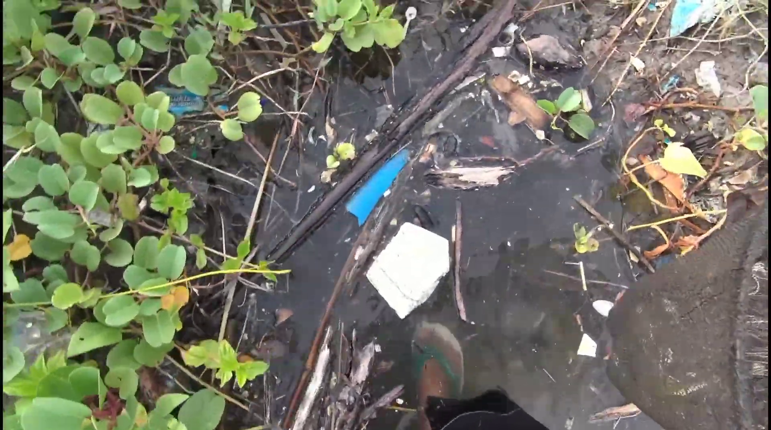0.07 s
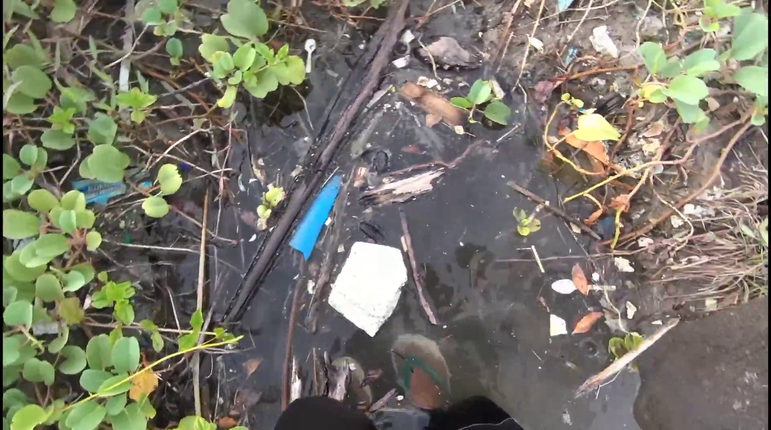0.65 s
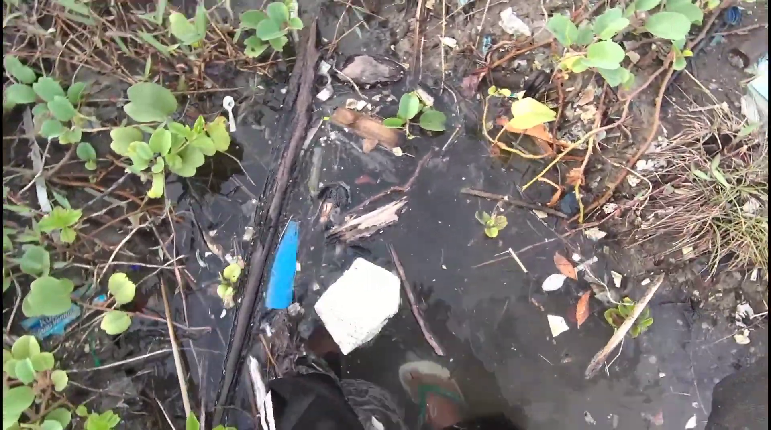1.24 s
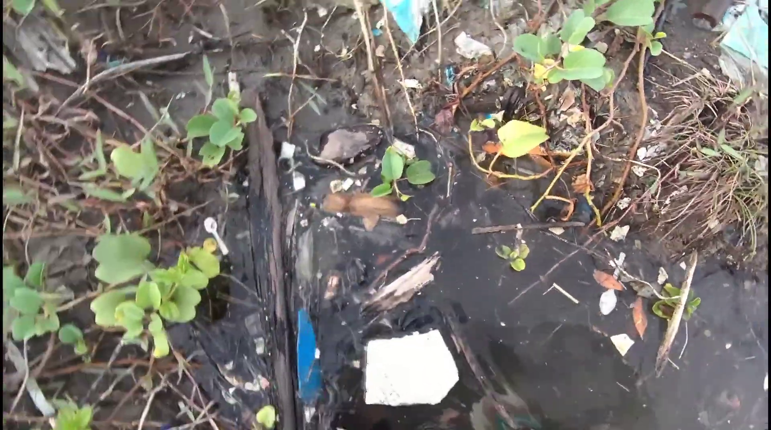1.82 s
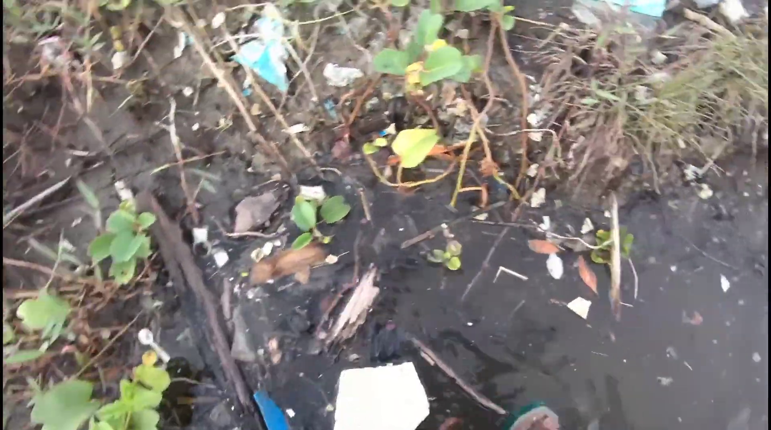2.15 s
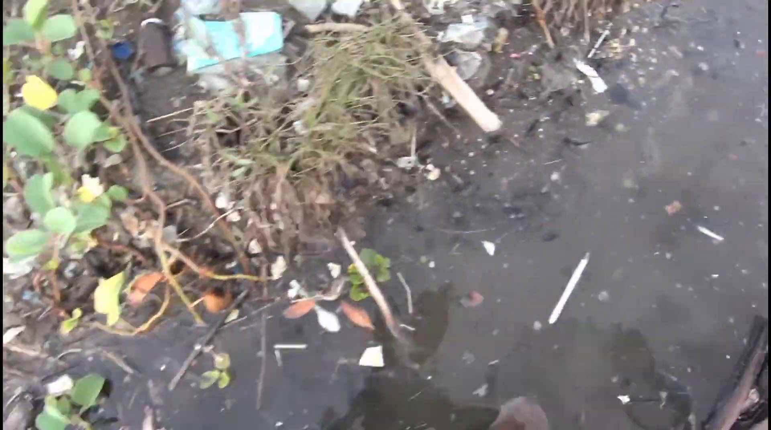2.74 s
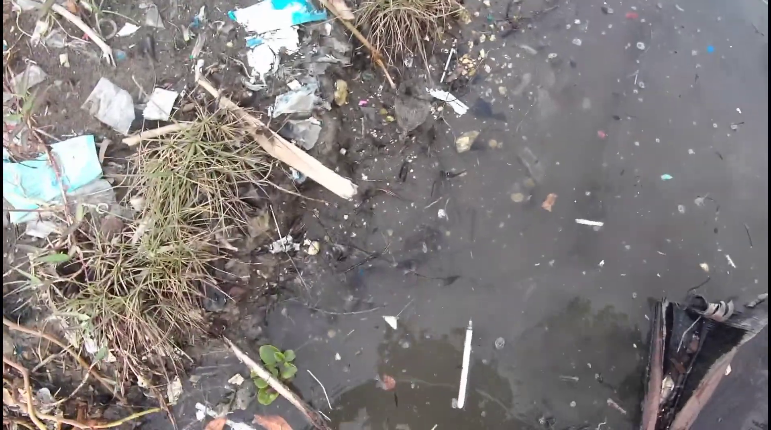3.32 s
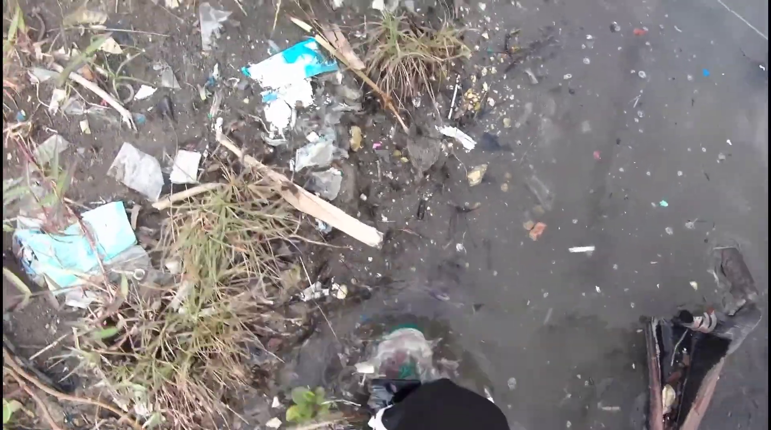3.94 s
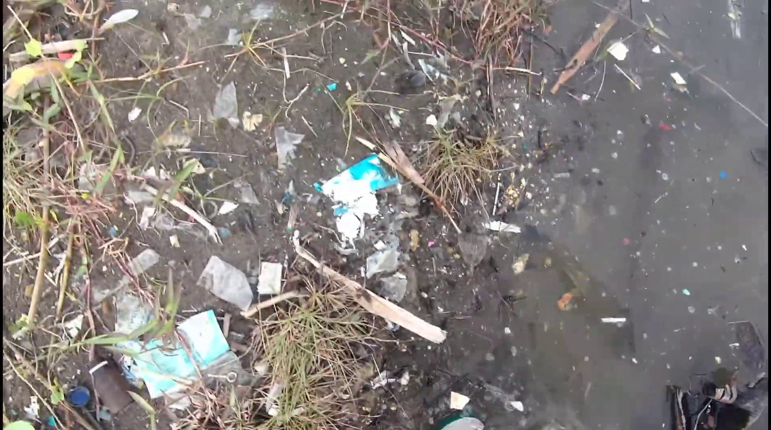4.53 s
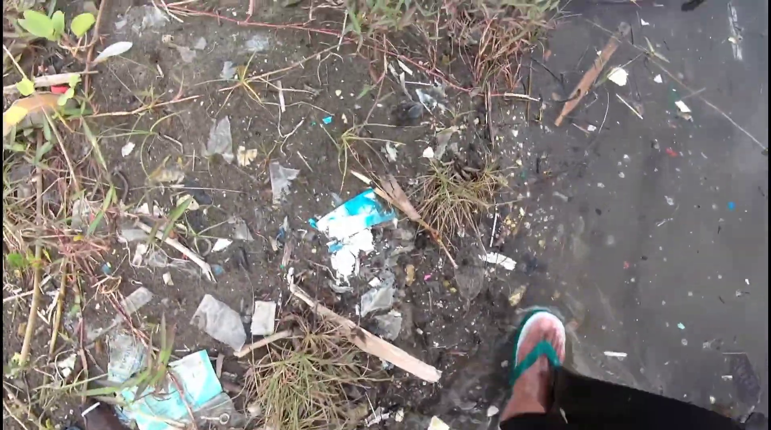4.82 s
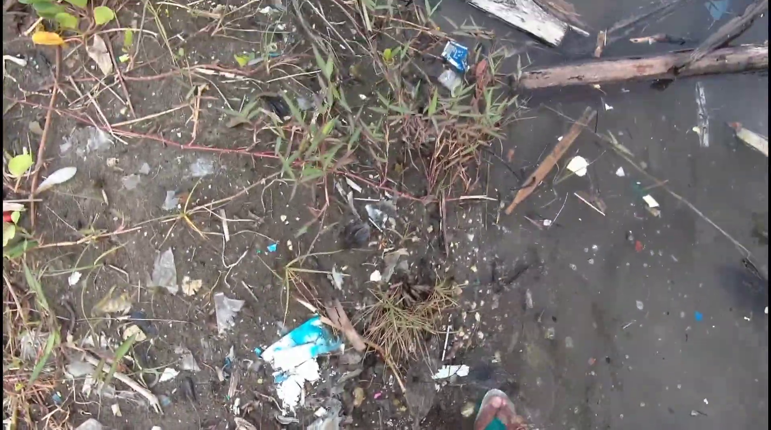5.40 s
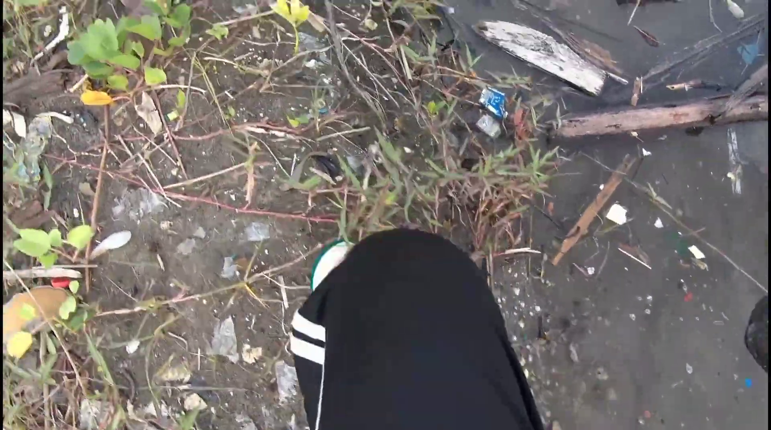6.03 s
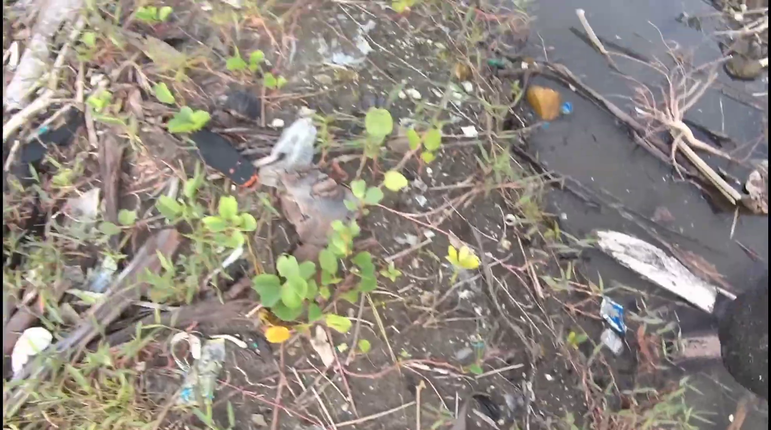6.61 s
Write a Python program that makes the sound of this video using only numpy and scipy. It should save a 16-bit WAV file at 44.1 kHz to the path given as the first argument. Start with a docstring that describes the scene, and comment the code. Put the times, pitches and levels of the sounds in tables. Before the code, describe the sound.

Close, unhurried footsteps slosh and gurgle through shallow water at a muddy shore. They start as small plops, grow busiest in the middle with squelching and light splashing, then give way to drips, a brief rustle of trousers and a few more steps onto the wet bank. A low outdoor rumble continues underneath, and gusts thump on the microphone, hardest at the end.

```python
"""Sandalled feet wade slowly through shallow muddy water and step up onto a wet bank.
Each step traps air that rings as bubbles; mud smacks and crackles, drops patter off a lifted sandal.
A trouser leg swishes past, cloth rubbing on cloth. Wind buffets the two microphone ports
over a low outdoor rumble, a steady drone and a few faint tones.
A faint fuzzy whine near 1 and 2 kHz comes and goes, probably microphone self-noise."""
import sys
import numpy as np
from scipy import signal
from scipy.fft import rfft, irfft
from scipy.io import wavfile
from scipy.ndimage import uniform_filter1d

SR = 44100
rng = np.random.default_rng(int(sys.argv[2]) if len(sys.argv) > 2 else 0)


def put_to_file(sound):
    """Save the sound as 16-bit audio at rate SR, in the file named by the first command-line argument."""
    columns = np.atleast_2d(sound).T  # one column per channel
    safe = np.clip(columns, -1, 1)
    whole_steps = np.round(safe * 32767)
    wavfile.write(sys.argv[1], SR, whole_steps.astype(np.int16))


N = 293706
TIME = np.arange(N) / SR
FREQ = np.fft.rfftfreq(N, 1 / SR)

# spray off water and mud: f/Hz, level/dB
SPRAY_SPECTRUM = [(700, -32), (1700, 10), (3200, 9.5), (5600, -0.5), (8000, -14), (14000, -28)]


def wading(churn_db=-4, wash_db=-9.5, crackle_db=-3.5, spray_db=-15.5,
           surge_db=2.3, surge_hz=25, spit_db=3, spit_hz=200):
    """Steps churn up bubbles and a soft wash in uneven surges; the mud crackles and spits."""
    # bubbles in churned water: f/Hz, level/dB
    water_bubbles = [(280, -19.5), (450, -4), (800, 3), (1100, 5), (1500, -11), (2300, -27)]
    # bubbles in mud: f/Hz, level/dB
    mud_bubbles = [(1400, -0.5), (1900, 8), (2500, 2), (3400, 0), (4300, -31), (5800, -1)]
    # pushed water: f/Hz, level/dB
    wash_spectrum = [(80, -5), (300, 7), (500, -1.5), (950, 17), (1600, -10.5), (2600, -13), (5000, -30),
                     (12000, -55)]
    churn = gain(churn_db) * swarm(water_bubbles, cycles=49, spread_db=14, rise_oct_s=28, count=4200)
    wash = gain(wash_db) * noise(gain(curve(wash_spectrum)), 1)
    crackle = gain(crackle_db) * swarm(mud_bubbles, cycles=13, spread_db=10, rise_oct_s=56, count=8000)
    spray = noise(gain(curve(SPRAY_SPECTRUM)), 1)
    spray = gain(spray_db) * evened(spray * gain(spit_db * drift(spit_hz)))
    surges = gain(surge_db * drift(surge_hz))
    water, mud = stirring(column=2), stirring(column=3)
    return surges * (water * (churn + wash) + mud * (crackle + spray))


def stirring(column, push_s=0.026, settle_s=0.028, ripple_db=-12, ripple_s=0.3):
    """Envelope of stirred water or mud: each push settles fast, its ripples lap on."""
    # pushes and pulls of a foot: t/s, hold/s, water level/dB, mud level/dB
    steps = [(.62, 0.79, -82, -80.5), (2.415, 0.23, -57, -76), (3.29, 0.06, -64, -69),
             (3.5, 0.22, -52, -62.5), (3.69, 0.098, -49, -61.5), (3.81, 0.18, -48, -59.5),
             (3.962, 0.03, -54.5, -55.5), (4.02, 0.037, -51.5, -60.5), (4.08, 0.08, -55.5, -66.5),
             (4.79, 0.17, -63, -75.5), (5.0, 0.11, -62, -83), (5.48, 0.022, -61.5, -66.5),
             (5.565, 0.18, -53.5, -69), (6.03, 0.062, -61, -66), (6.175, 0.019, -60.5, -73),
             (6.33, 0.026, -57.5, -71), (6.462, 0.021, -54.5, -57.5), (6.505, 0.023, -48, -53.5),
             (6.56, 0.14, -62, -72.5)]
    pushes = envelope(steps, push_s, settle_s, column)
    ripples = gain(ripple_db) * envelope(steps, push_s, ripple_s, column)
    return np.hypot(pushes, ripples)


def swarm(sizes, cycles, spread_db, rise_oct_s, count, scatter_s=0.00008):
    """Small bubbles of many sizes scattered around the foot, levelled to steady power."""
    out = np.zeros((2, N))
    low_hz, high_hz = sizes[0][0], sizes[-1][0]
    for k, (when, size, strength, life, climb, side) in enumerate(rng.random((count, 6))):
        hz = low_hz * (high_hz / low_hz) ** size
        t60_s = cycles * 2 ** (2 * life - 1) / hz
        ring = bubble(hz, t60_s, rise_oct_s * climb, lag_s=scatter_s * (2 * side - 1), pinch_s=1 / hz)
        add(out, (k + when) / count * N / SR, gain(curve(sizes, hz) + spread_db * strength ** 2) * ring)
    return out / np.sqrt(uniform_filter1d((out ** 2).mean(0), size=1800) + 1e-9)


def bubble(hz, t60_s, rise_oct_s, lag_s=0, pinch_s=0.00055):
    """Pinched-off air rings and glides in pitch, upward as it nears the surface."""
    t = np.maximum(np.arange(int(t60_s * SR) + 1) / SR - np.array([[0], [lag_s]]), 0)
    octaves = rise_oct_s * t
    turns = np.cumsum(hz * 2 ** np.minimum(octaves, 1) * (t > 0), axis=1) / SR
    shape = (1 - np.exp(-t / pinch_s)) * np.exp(-np.log(1000) * t / t60_s)
    cutoff = 1 / (1 + (np.maximum(octaves, 0) / 0.85) ** 12)  # dies near 0.85 octave up
    return np.sin(2 * np.pi * turns) * shape * cutoff


def plops(pinch_cycles=0.87, splat_db=-31, splat_s=0.0066):
    """Distinct large bubbles and drips, each opening with a tiny splat of spray."""
    # single bubbles: t/s, f/Hz, level/dB, t60/s, rise/(octave/s)
    bubbles = [ (0.699, 1013, -62, 0.21, 5.5), (.755, 2270, -59, 0.027, 0), (0.776, 975, -53, 0.1, 0),
               (.974, 2660, -68, 0.038, 5), (1.08, 3560, -68.5, 0.065, 2), (1.582, 960, -57.5, 0.11, 1),
               (2.394, 2110, -48.5, 0.032, -15), (2.448, 900, -41.5, 0.056, 5),
               (2.451, 1330, -43.5, 0.018, 33), (2.429, 2330, -57, .025, 5), (2.507, 566, -44, 0.034, 2),
               (2.511, 1050, -50, .035, 7), (2.524, 760, -50, 0.069, 17), (2.586, 880, -47, 0.036, 6),
               (2.613, 1020, -47, 0.028, -1), (3.240, 652, -47.5, 0.12, 3), (3.27, 1110, -40, 0.047, 12),
               (3.275, 1000, -35, 0.048, 7.5), (3.283, 1104, -32, 0.024, 7), (3.305, 600, -39, 0.048, 5),
               (3.416, 795, -45, 0.071, 2.5), (3.47, 3040, -42, 0.0069, 12),
               (3.471, 1030, -46.5, 0.039, -10), (3.517, 810, -40, 0.079, 16.5),
               (3.528, 1295, -34.5, 0.02, 7), (3.568, 954, -31, 0.013, 4), (3.600, 890, -42.5, 0.066, 17),
               (3.612, 550, -51, 0.11, -10), (3.704, 368, -40.5, 0.2, 14.5), (3.742, 495, -48, 0.17, 5.5),
               (3.798, 946, -40, 0.044, 3), (3.825, 1026, -39.5, 0.06, 3.5), (3.862, 1130, -39, 0.029, 10),
               (3.882, 1134, -36, 0.036, 4), (3.912, 2870, -47, 0.022, 65), (3.914, 940, -36, 0.053, 0),
               (3.932, 637, -42, 0.16, -3), (3.961, 1230, -32, 0.018, 11), (3.964, 450, -33, 0.035, -5),
               (3.973, 1420, -35.5, 0.018, 22), (3.981, 311, -36, 0.082, 6.5),
               (4.017, 798, -40.5, 0.08, 4.5), (4.043, 766, -40.5, 0.075, 5.5),
               (4.092, 641, -39, 0.078, -11), (4.112, 964, -42, 0.064, 19), (4.164, 960, -49, 0.035, 9),
               (4.5, 2000, -51.5, 0.017, 12), (4.511, 2350, -54.5, .018, 14), (4.659, 2660, -55, 0.022, 11),
               (5.006, 1340, -40.5, 0.0075, 0), (5.073, 3500, -48.5, 0.0083, 12),
               (5.19, 858, -44.5, 0.12, 38), (5.481, 978, -36, 0.051, 1), (5.549, 710, -44, .035, -8),
               (5.565, 597, -36, 0.022, 6), (5.595, 914, -38, 0.029, 6), (5.611, 742, -35, 0.038, -0.5),
               (5.655, 883, -42, 0.096, 35), (5.672, 770, -40.5, 0.036, 3), (5.731, 1020, -48, 0.023, 17),
               (5.75, 504, -45.5, 0.27, 21), (6.014, 820, -41.5, 0.024, 12), (6.171, 1270, -34, 0.011, 21),
               (6.459, 1035, -36, 0.045, -16), (6.497, 893, -34.5, 0.033, -3), (6.509, 650, -28, 0.028, -8),
               (6.525, 482, -27.5, 0.019, -3), (6.618, 738, -44.5, 0.048, 22)]
    t, out = np.arange(SR // 50) / SR, np.zeros((2, N))
    spray = noise(gain(curve(SPRAY_SPECTRUM)), 0.78)
    for t_s, hz, db, t60_s, rise_oct_s in bubbles:
        ring = bubble(hz, t60_s, rise_oct_s, pinch_s=pinch_cycles / hz)
        splat = spray[:, round(t_s * SR):][:, :len(t)] * np.exp(-t / splat_s)
        add(out, t_s, gain(db) * wobbled(ring))
        add(out, t_s, gain(db + splat_db) * splat)
    return out


def wobbled(ring, wobble_hz=130, wobble_db=1.1):
    """Moving water squeezes a bubble, so its ring swells and sags unevenly."""
    t = np.arange(ring.shape[1]) / SR
    sway = sum(np.sin(2 * np.pi * (wobble_hz * 2 ** (2 * rate - 1) * t + turn))
               for rate, turn in rng.random((4, 2)))
    return ring * gain(wobble_db * sway)


def smacks(half_width_hz=380, attack_s=0.001, decay_s=0.0028):
    """A film of water or mud bursts under the sole: milliseconds of band noise."""
    # bursting films: t/s, f/Hz, level/dB
    films = [(2.509, 700, -48), (2.612, 980, -49), (3.275, 1610, -52), (3.471, 1840, -52),
             (3.556, 905, -45), (3.567, 1100, -46), (3.637, 2200, -46), (3.644, 2100, -44),
             (3.672, 970, -39), (3.691, 1970, -44), (3.699, 900, -41), (3.714, 2240, -47),
             (3.789, 1200, -39.5), (3.807, 1300, -38), (3.827, 1650, -41.5), (3.828, 3830, -55.5),
             (3.863, 2160, -47), (3.958, 1134, -34), (3.973, 1100, -38), (3.975, 1950, -41),
             (3.984, 3320, -47), (4.005, 1400, -46), (4.018, 1420, -40.5), (4.038, 2150, -47),
             (4.042, 950, -38), (4.687, 1550, -53.5), (4.746, 1350, -50), (4.777, 1400, -58),
             (4.785, 2660, -56), (4.807, 2010, -51), (4.862, 3400, -57), (4.883, 2750, -53),
             (5.007, 2300, -55.5), (5.048, 2540, -55), (5.090, 1680, -53), (5.48, 3050, -53.5),
             (5.547, 3100, -58), (5.569, 2080, -48), (5.581, 910, -38.5), (5.596, 1020, -38),
             (5.610, 2150, -50), (5.640, 2040, -53), (5.668, 2040, -52), (5.686, 2090, -55),
             (5.733, 1200, -51), (5.940, 1900, -49.5), (6.038, 2170, -49.5), (6.084, 1470, -45),
             (6.180, 1390, -46), (6.190, 1250, -43.5), (6.499, 1200, -53), (6.510, 880, -33.5),
             (6.552, 2170, -44)]
    t, out = np.arange(2048) / SR, np.zeros((2, N))
    hz = np.fft.rfftfreq(len(t), 1 / SR)
    shape = (1 - np.exp(-t / attack_s)) * np.exp(-t / decay_s)
    for t_s, centre_hz, db in films:
        band = np.exp(-((hz - centre_hz) / half_width_hz) ** 2)
        burst = shape * irfft(band * rfft(rng.standard_normal(len(t))))
        add(out, t_s, gain(db) * burst[None] * np.linalg.norm(shape) / np.linalg.norm(burst))
    return out


def drips(drops_per_s=550, low_hz=1910, high_hz=3540, spread_db=8):
    """Drops run off a lifted sandal; each traps a tiny bubble where it lands."""
    # flurries of drops: t/s, length/s, top level/dB
    flurries = [(4.757, 0.018, -55), (4.775, 0.03, -50), (4.834, 0.078, -54.5), (4.914, 0.092, -60),
                (5.03, 0.096, -61)]
    out = np.zeros((2, N))
    for t_s, length_s, db in flurries:
        for k, (when, size, weakness) in enumerate(rng.random((80, 3))):
            if k < drops_per_s * length_s:
                ring = bubble(low_hz * (high_hz / low_hz) ** size, t60_s=0.0066, rise_oct_s=16)
                add(out, t_s + when * length_s, gain(db - spread_db * weakness) * ring)
    return out


def sizzle(pops_per_s=700, spread_db=4, fade_s=0.022):
    """Fine droplets land and tiny bubbles burst: bright ticks, mostly weak."""
    # showers of droplets: t/s, hold/s, level/dB
    showers = [(3.31, .025, -78.5), (3.77, 0.29, -82), (4.77, 0.283, -84.5), (5.5, 0.37, -90)]
    # one tick: f/Hz, level/dB
    tick_spectrum = [(3000, -18), (5600, 8.5), (8000, -11.5), (14000, -4.5)]
    pops = rng.random(N) < pops_per_s / SR
    ticks = pops * gain(spread_db * np.minimum(rng.exponential(1, N), 4))
    right = rng.random(N)
    patter = irfft(rfft(ticks * np.array([1 - right, right])) * gain(curve(tick_spectrum)), N)
    return envelope(showers, fade_s, fade_s) * evened(patter)


def bank_scatter(sound, t60_s=0.046, echoes_per_s=2000, gap_s=0.003, side_hz=1200):
    """Legs, litter and the bank scatter a brief tail, alike at both ports in the bass."""
    t = np.arange(SR // 4) / SR
    taps = rng.standard_normal((2, len(t))) * (rng.random((2, len(t))) < echoes_per_s / SR) * (t > gap_s)
    mid, side = taps * np.exp(-np.log(1000) * t / t60_s)
    side = signal.sosfilt(signal.butter(2, side_hz, "highpass", fs=SR, output="sos"), side)
    tail = np.array([mid + side, mid - side])
    tail /= np.linalg.norm(tail, axis=1, keepdims=True)
    return signal.fftconvolve(sound, tail, axes=1)[:, :N]


def trousers(grain_db=2.5, catch_hz=300, patchy_db=1.0, patchy_hz=80, split_hz=3000, flick_s=0.0051):
    """Cloth slides over cloth as the knee lifts; the weave catches unevenly and folds snap over."""
    # rubbing cloth: f/Hz, level/dB
    cloth_spectrum = [(400, -22), (900, 5), (1600, 2), (2600, 3), (4000, 3.5), (5500, 0), (8000, -16.5),
                      (11000, -9), (15000, -7)]
    # sliding strokes: t/s, hold/s, level/dB
    strokes = [(5.840, 0.045, -62), (5.9, 0.086, -69.5), (6.036, 0.0036, -68), (6.064, 0.024, -62.5),
               (6.17, .005, -67.5)]
    # flicks of a fold: t/s, hold/s, level/dB
    flicks = [(3.449, 0.0022, -67.5), (3.470, 0.0017, -66.5), (5.847, .006, -70.5), (6.068, .003, -68),
              (6.322, 0.008, -69.5)]
    rub = rfft(noise(gain(curve(cloth_spectrum)), 0.71))
    low = 1 / (1 + (FREQ / split_hz) ** 4)
    scratch = sum(irfft(rub * band, N) * gain(patchy_db * drift(patchy_hz)) for band in (low, 1 - low))
    motion = envelope(strokes, attack_s=0.019, release_s=0.034) + envelope(flicks, flick_s, flick_s)
    return motion * evened(scratch * gain(grain_db * drift(catch_hz)))


def wind(gust_db=-1, lumpy_db=2, lumpy_hz=21, build_s=0.023, lull_s=0.046):
    """Eddies press on each port separately; the hardest arrive as single thumps."""
    # eddy pressure: f/Hz, level/dB
    eddy_spectrum = [(8, -5), (25, -1.5), (60, -4), (110, -14), (200, -25), (400, -40), (1000, -65),
                     (3000, -90)]
    # gusts: t/s, hold/s, left level/dB, right level/dB
    gusts = [(.03, 0.42, -49, -46), (1.235, 0.023, -77, -36), (2.41, 0.14, -46.5, -41),
             (2.6, 0.28, -46, -53.5), (4.48, 0.13, -47.5, -49.5), (4.76, 0.16, -54, -39),
             (5.03, 0.27, -56.5, -43), (6.13, 0.042, -36, -33.5), (6.25, 0.033, -44.5, -43.5),
             (6.545, 0.02, -23, -23), (6.6, 0.083, -26.5, -30.5)]
    # hard buffets: t/s, level/dB, f/Hz, right share (0-1)
    buffets = [(0.139, -31, 21.8, 1), (1.239, -31.5, 68.6, 1), (4.772, -20.5, 53, 0.92),
               (4.866, -25, 54.4, 0.85), (5.037, -27, 44, 0.94), (5.276, -23, 46.7, 0.9),
               (6.152, -20.5, 33.5, 0.5), (6.182, -21, 75.5, 1), (6.559, -21, 44.7, 0.05)]
    eddies = noise(gain(curve(eddy_spectrum)), 0.57)
    eddies /= np.sqrt(uniform_filter1d(eddies ** 2, size=4000, axis=1) + 1e-9)
    strength = np.array([envelope(gusts, build_s, lull_s, column) for column in (2, 3)])
    out = eddies * strength * gain(gust_db + lumpy_db * drift(lumpy_hz))
    for t_s, db, hz, right in buffets:
        phase = np.pi * hz * (TIME - t_s)
        thump = (1 - 2 * phase ** 2) / (1 + phase ** 2) ** 2.5
        out += gain(db) * np.array([[1 - right], [right]]) * thump
    return out


def thumps():
    """Two dull, short thumps, probably wind or handling on the microphone."""
    # thumps: t/s, level/dB, factor on pitch and decay rate
    hits = [(1.238, -49, 0.77), (6.260, -50.5, 2.2)]
    # thump modes: f/Hz, level/dB, t60/s
    modes = [(255, 9, 0.023), (330, 0.5, 0.017), (465, -11, 0.024), (640, -19, .015)]
    t, out = np.arange(SR // 8) / SR, np.zeros((2, N))
    for t_s, db, pitch in hits:
        ring = sum(gain(mode_db - 60 * t * pitch / t60_s) * np.sin(2 * np.pi * hz * pitch * t)
                   for hz, mode_db, t60_s in modes)
        add(out, t_s, gain(db) * ring[None])
    return out


def outdoors(level_db=-52.43, swell_db=1.35, swell_hz=7.1):
    """Far rumble under a thin hiss, both swelling and sinking slightly."""
    # open air: f/Hz, level/dB
    air_spectrum = [(10, 1), (30, 0), (60, -4), (100, -3), (160, -8.5), (260, -15.5), (400, -22.5),
                    (560, -26), (780, -26.5), (1100, -25), (1500, -32.5), (1900, -37.5), (2600, -42),
                    (3600, -44.5), (5500, -48), (10000, -55.5), (14500, -54)]
    # open air at the two ports: f/Hz, correlation
    air_correlation = [(40, 0.85), (130, 1), (640, 0.9), (1400, 0.88), (3100, 1), (7000, 0.062)]
    swell = gain(level_db + swell_db * drift(swell_hz))
    return swell * noise(gain(curve(air_spectrum)), curve(air_correlation))


def drone_and_whine(flutter_db=4, flutter_hz=28, whine_db=2):
    """Steady low drone; a faint fuzzy whine, probably microphone self-noise, comes and goes."""
    # drone, then two whine bands: f/Hz, half-width/Hz, level/dB
    bands = [(60.9, 7, -58), (1004, 49, -80.5), (1965, 37, -74.5)]
    # whine level: t/s, relative level/dB
    whine_levels = [(0.0, -77.5), (0.55, -77.5), (0.74, -86.5), (.97, -80.5), (1.66, -79.5), (1.78, -72.5),
                    (1.93, -86), (2.15, -78), (2.3, -86.5), (2.57, -78.5), (2.88, -74), (3.08, -82),
                    (3.24, -68.5), (3.6, -81.5), (4.35, -77), (4.53, -87.5), (5.32, -84.5), (6.2, -81),
                    (6.38, -70), (6.52, -73), (6.62, -66)]
    drone, *whines = [gain(db) * noise(1 / (1 + ((FREQ - hz) / half_width_hz) ** 2), 0.95)
                      for hz, half_width_hz, db in bands]
    whine = sum(whines) * gain(flutter_db * drift(flutter_hz))
    whine /= evened(np.sqrt(uniform_filter1d(whine[0] ** 2, size=5000) + 1e-16))  # flatten slow swings
    swell = evened(gain(np.interp(TIME, *np.transpose(whine_levels))))
    return drone + whine * swell * gain(whine_db)


def far_tones(waver=0.0092, waver_hz=30, flutter_db=3, flutter_hz=34):
    """Thin, slowly rising tones waver and barely clear the background."""
    # far tones: t/s, length/s, first f/Hz, last f/Hz, level/dB
    tones = [(0.337, 0.28, 615, 673, -70.5), (0.622, 0.56, 529.5, 580, -70.5),
             (2.69, 0.215, 615, 648, -68.5)]
    out = np.zeros((2, N))
    bend = 1 + waver * drift(waver_hz)
    flutter = gain(flutter_db * drift(flutter_hz))
    for t_s, length_s, first_hz, last_hz, db in tones:
        start, count = int(t_s * SR), int(length_s * SR)
        span = slice(start, start + count)
        hz = np.linspace(first_hz, last_hz, count) * bend[span]
        tone = np.sin(2 * np.pi * np.cumsum(hz) / SR) * signal.windows.tukey(count, 0.5) * flutter[span]
        add(out, t_s, gain(db) * tone[None])
    return out


def gain(db):
    """Decibels to amplitude."""
    return 10 ** (np.asarray(db) / 20)


def evened(x):
    """Scales to rms 1."""
    return x / np.sqrt(np.mean(x ** 2) + 1e-20)


def curve(points, hz=FREQ):
    """Interpolates (f/Hz, value) rows over log frequency."""
    points_hz, values = np.transpose(points)
    return np.interp(np.log(hz + 1), np.log(points_hz + 1), values)


def add(mix, t_s, sound):
    """Mixes a sound into both channels at t_s."""
    part = mix[:, max(round(t_s * SR), 0):][:, :sound.shape[1]]
    part += sound[:, :part.shape[1]]


def noise(spectrum, correlation=0):
    """Stereo noise, rms 1, of given amplitude spectrum and left-right correlation."""
    left, other = rfft(rng.standard_normal((2, N)))
    correlation = np.clip(correlation, -1, 1)
    right = correlation * left + np.sqrt(1 - correlation ** 2) * other
    return evened(irfft(spectrum * np.array([left, right]), N))


def drift(rate_hz):
    """Low-passed random wander, rms 1."""
    return evened(noise(np.exp(-(FREQ / rate_hz) ** 2))[0])


def envelope(events, attack_s, release_s, column=2):
    """Attack, hold and release per row (t/s, hold/s, levels/dB); overlaps add in power."""
    power = np.zeros(N)
    for row in events:
        early_s = np.maximum(row[0] - TIME, 0)
        late_s = np.maximum(TIME - row[0] - row[1], 0)
        power += (gain(row[column]) * np.exp(-early_s / attack_s - late_s / release_s)) ** 2
    return np.sqrt(power)


def scene(scatter_db=-17):
    """Feet in the water, clothes, wind and surroundings."""
    near = plops() + smacks() + wading() + drips() + sizzle() + thumps()
    tail = gain(scatter_db) * bank_scatter(near)
    return near + tail + trousers() + wind() + outdoors() + drone_and_whine() + far_tones()


def record(dry, cutoff_hz=15550):
    """Each microphone port colours and delays the sound in its own way; a low-pass follows."""
    # port imbalance: f/Hz, left minus right level/dB
    imbalance = [(100, 0), (400, 1), (700, 0.7), (1200, 3.5), (1800, 5.5), (2150, 12), (2550, -3),
                 (3300, -4), (5600, -13), (7000, -6), (9000, 1.5), (14000, 5.5)]
    # port phase: f/Hz, left lead/rad
    lead = [(400, -.02), (700, -.1), (1200, -.7), (1800, -1.5), (2150, -1.8), (3300, -1.6), (14000, -1.5)]
    # dips in the microphone response: f/Hz, half-width/Hz, level/dB
    dips = [(4530, 283, -13.5), (6490, 230, -24.5), (7620, 1230, -11.5), (9740, 320, -12)]
    side = np.array([[0.5], [-0.5]])
    dips_db = sum(db * np.exp(-np.abs((FREQ - hz) / half_width_hz) ** 3) for hz, half_width_hz, db in dips)
    response = gain(dips_db + side * curve(imbalance)) * np.exp(1j * side * curve(lead))
    end_fades = signal.windows.tukey(N, 0.001)
    heard = irfft(rfft(dry * end_fades) * response, N)
    low_pass = signal.firwin(511, cutoff_hz, window=("kaiser", 9), fs=SR)
    return signal.oaconvolve(heard, low_pass[None], "same")


dry = scene()
out = record(dry)
put_to_file(out)
```